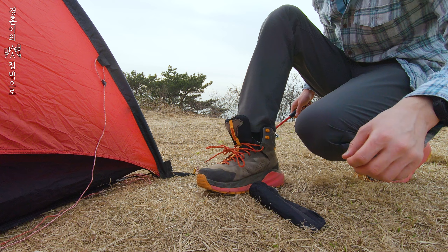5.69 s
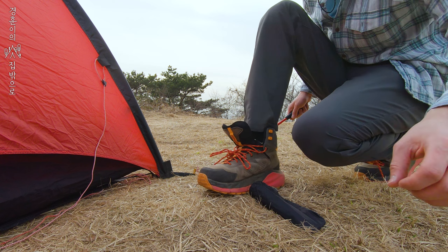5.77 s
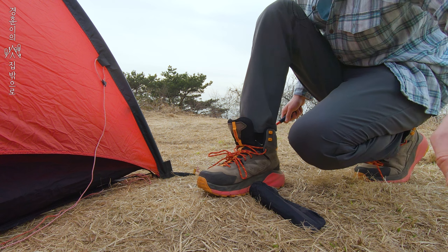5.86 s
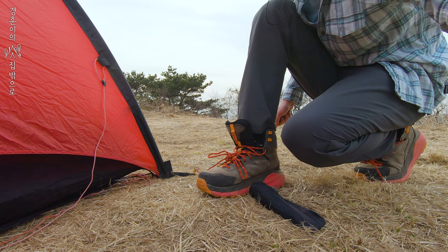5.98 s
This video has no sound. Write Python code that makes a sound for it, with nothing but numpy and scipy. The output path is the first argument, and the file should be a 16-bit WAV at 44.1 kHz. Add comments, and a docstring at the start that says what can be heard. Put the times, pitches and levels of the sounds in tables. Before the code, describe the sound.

A close, dry outdoor sound with faint lumpy wind and a very soft, low engine hum slowly coming nearer. From 0.25 s a hammer strikes a steel peg in hard ground: nine bright, overloaded clacks, about 0.3 s apart at first, then roughly every 0.2 s until 2.1 s. Each is a gritty metallic burst that stops almost dead, with a small earth thud, a faint scattered tail and often a lighter rebound. Clothes swish around 2.2-2.45 s. A slower run of seven blows lasts from 2.54 to 4.8 s, with stronger thuds and soil knocks, the clacks growing shorter and drier. Tiny distant peeps at 0.34 and 2.6 s are barely noticeable. After 4.8 s it is quiet; a small tap at 5.24 s, rustling from 5.35 s, a clear dull knock at 5.5 s, then from 5.7 s a boot crunches dry grass, fading with fabric rustle to 6 s.

```python
"""Hammering a steel tent peg

A hammer drives a steel peg into hard, dry ground in a light breeze: soil-damped modes make bright clacks
that clip, soft pushes make earth thuds and knocks, and the clack shortens within each of two runs of blows.
Snapping threads make clothes rustle, filtered noise makes wind, and sine orders make a far engine.
Gear and straw tap, far peeps sound twice, and at the end a boot shifts on dry grass."""
import sys
import numpy as np
from scipy import signal
from scipy.fft import rfft, irfft, next_fast_len
from scipy.io import wavfile

SR = 44100
rng = np.random.default_rng(int(sys.argv[2]) if len(sys.argv) > 2 else 0)


def bounce(signal):
    """Save signal as a 16-bit WAV file at the path given by the first command-line argument."""
    frames = np.transpose(np.atleast_2d(signal))
    limited = np.clip(frames, -1, 1)
    pcm = np.round(limited * 32767).astype(np.int16)
    wavfile.write(sys.argv[1], SR, pcm)


N = 265658
TIME = np.arange(N) / SR
AGE = TIME[:SR // 6]  # seconds since the start of a short sound

# Hammer blows on the peg. Each row: start in seconds, sliding time of the peg in seconds, relative levels
# of scatter and thud in dB, push on the soil in seconds, relative levels of soil knock and hollow body in dB,
# then frequency in Hz and relative level in dB of the low, the middle and the high ring.
BLOWS = [(0.2553, 0.0035, -2.5, -10.5, 0.0023, -29.5, 2, 4440, -14, 7978, 1, 12890, -2.5),
         (0.5497, 0.0027, 1, -11, 0.0027, -23.5, -9, 4645, -6, 8768, 0.5, 10670, -1.5),
         (0.8172, 0.0022, -6, -16, 0.0032, -28, -10.5, 4250, -14, 5250, -3.5, 12670, -1),
         (1.0194, 0.0026, -4.5, -16.0, 0.0049, -46.5, -13, 4384, -7.5, 5545, -0.5, 13020, -2),
         (1.242, 0.0021, -5, -18, 0.0046, -33.5, -18, 4365, -6, 6152, 2.5, 13150, -14),
         (1.4526, 0.0018, -5, -18.5, 0.0042, -40.5, -15, 3170, -14, 5840, -4.5, 12250, -3),
         (1.6714, 0.0016, -5.5, -17, 0.0043, -28, -9, 3395, -15, 11190, 0.5, 13800, -2),
         (1.8826, 0.0014, -2, -19.5, 0.0028, -41.5, -51, 3420, -20, 8424, -6.5, 11800, 2.5),
         (2.0938, 0.0015, -1.5, -11.5, 0.0029, -31, -3, 3380, -6.5, 9530, -4.5, 12000, -0.5),
         (2.5432, 0.0033, -3.5, 0.5, 0.0024, -30, -2.5, 3880, -9.5, 8840, 2.5, 14000, 3),
         (3.0036, 0.0031, -9, 4.5, 0.004, -13.5, 0, 3660, -14, 5373, -2, 13820, 5),
         (3.484, 0.0019, 4, -5.5, 0.0056, -29.5, -17, 3648, -6.5, 6975, -4, 13940, 0),
         (3.8351, 0.0014, 0, -2.5, 0.003, -16.5, -7.5, 3223, -15.5, 8170, -23, 14470, -7),
         (4.1767, 0.0011, 4.5, -2.0, 0.0023, -14, 4, 3770, -9, 7116, 0.5, 14340, -5.5),
         (4.4905, 0.0011, 4.5, -1.5, 0.0027, -16.5, -8.5, 3850, -10.5, 7014, -6, 11970, -11.5),
         (4.7974, 0.00074, 5, -1, 0.0029, -10, -2, 4110, -9, 7880, -2.5, 13220, -0.5)]
# Spectrum of scattered sound. Each row: frequency in Hz, relative level per Hz in dB.
SCATTER_SPECTRUM = [(200, 4), (600, 8), (1200, -10.5), (2200, -12), (4000, -4), (8000, -2), (13000, 1),
                    (16000, -10.5)]


def from_db(db):
    """Level law: 20 dB is a factor of ten in amplitude."""
    return 10 ** (np.asarray(db) / 20)


def rms_one(x):
    """Normalization to unit effective value."""
    return x / np.sqrt(np.mean(x ** 2) + 1e-20)


def in_time(rows):
    """Linear interpolation: the columns of a table joined by straight lines in time."""
    s, *columns = np.transpose(rows)
    return [np.interp(TIME, s, column) for column in columns]


def add(track, s, sound):
    """Superposition: mixes a sound in from a given second."""
    start = round(s * SR)
    track[start:start + len(sound)] += sound[:N - start]


def band(x, low_hz, high_hz):
    """Band-pass filtering between two corner frequencies."""
    corners = [low_hz, min(high_hz, .45 * SR)]
    return signal.sosfilt(signal.butter(2, corners, "band", fs=SR, output="sos"), x)


def resonate(x, hz, width_hz):
    """Damped resonance: a pole pair whose radius sets the bandwidth, with a gain near 1 at the peak."""
    r = np.exp(-np.pi * width_hz / SR)
    zeros = np.array([1, 0, -1]) * (1 - r * r) / 2
    poles = [1, -2 * r * np.cos(2 * np.pi * hz / SR), r * r]
    return signal.lfilter(zeros, poles, x)


def dying(t60, hold=0):
    """Exponential decay: full strength for the hold, then 60 dB lost in each t60 (both in seconds)."""
    return np.exp(-np.log(1000) * np.maximum(AGE - hold, 0) / t60)


def swell(s, length_s):
    """Gaussian envelope: a smooth rise and fall around a moment, its length taken at half height."""
    return .5 ** ((2 * (TIME - s) / length_s) ** 2)


def half_push(push_s, delay_s):
    """Contact force: one smooth sine-squared push after a delay."""
    return np.sin(np.pi * np.clip((AGE - delay_s) / push_s, 0, 1)) ** 2


def spectral_gain(spectrum, size):
    """Frequency response: levels joined by straight lines over the logarithm of frequency."""
    hz, db = np.transpose(spectrum)
    bins = np.maximum(np.arange(size // 2 + 1) * SR / size, 1)
    return from_db(np.interp(np.log(bins), np.log(hz), db))


def colour(x, spectrum):
    """Spectral shaping: weights each frequency of a sound by a spectrum and sets its rms to 1."""
    size = next_fast_len(len(x))
    return rms_one(irfft(rfft(x, size) * spectral_gain(spectrum, size), size)[:len(x)])


def noise(spectrum, size=N):
    """Random sound with a prescribed spectrum, rms 1."""
    return colour(rng.standard_normal(size), spectrum)


def burst(low_hz, high_hz):
    """Band-limited noise: a short stretch, rms 1."""
    return rms_one(band(rng.standard_normal(len(AGE)), low_hz, high_hz))


def drift(rate):
    """Slow fluctuation: random points, rate per second, joined by lines; the last is held; rms 1."""
    knots = rng.standard_normal(1000)
    return rms_one(np.interp(TIME * rate, np.arange(len(knots)), knots))


def grains(per_s, spread_db):
    """Stick-slip friction as a random train of tiny snaps of uneven size, rms 1."""
    sizes = from_db(spread_db * np.minimum(rng.exponential(1, N), 4))
    signed_sizes = sizes * rng.choice([-1, 1], N)
    return rms_one(signed_sizes * (rng.random(N) < per_s / SR))


def outdoors(gust_db=2.0, gust_hz=110, air_db=-43.5, rumble_db=1):
    """Turbulence: wind lumpy in the bass and steady above, over the hush of open country and a far engine."""
    # Strength of the breeze. Each row: time in seconds, relative level in dB.
    breeze_levels = [(0.0, -35), (0.92, -38), (1.09, -41), (1.52, -39), (2.33, -41.5), (2.8, -34),
                     (3.22, -37), (3.42, -35), (6.02, -35.5)]
    # Spectrum of the wind. Each row: frequency in Hz, relative level per Hz in dB.
    wind_spectrum = [(10, 2), (30, 0.5), (60, -1.5), (100, -10), (210, -20), (320, -23), (550, -30),
                     (850, -33.5), (1300, -49.5), (2600, -75)]
    # Spectrum of the open country. Each row: frequency in Hz, relative level per Hz in dB.
    air_spectrum = [(10, 6), (35, -0.5), (90, -11.5), (170, -9.5), (300, -24), (550, -27), (850, -33.5),
                    (1300, -46.5), (2200, -43.5), (6000, -55.5), (9000, -41.5), (13000, -49),
                    (16000, -60.5)]
    gust = from_db(-33.5) * swell(s=0.095, length_s=0.074)  # one short gust on top of the breeze
    strength = from_db(in_time(breeze_levels)[0] + rumble_db) + gust
    wind = noise(wind_spectrum)
    rumble = signal.sosfiltfilt(signal.butter(2, gust_hz, fs=SR, output="sos"), wind)
    lumpy_wind = wind - rumble + rumble * from_db(gust_db * drift(13))
    return strength * lumpy_wind + from_db(air_db) * noise(air_spectrum) + drone()


def drone(mean_hz=119.5, waver=.016, throb_db=2.0, start_db=-48.5, rise_db_per_s=1.08):
    """Harmonic series: a far engine slowly comes nearer, its pitch and orders made unsteady by moving air."""
    # Orders of the engine. Each row: multiple of the base frequency, relative level in dB.
    engine_orders = [(1, 2.5), (2, -9), (3, -13.5), (4, -21)]
    turns = np.cumsum(mean_hz * (1 + waver * drift(16))) / SR
    orders = np.zeros(N)
    for k, db in engine_orders:
        orders += from_db(db + throb_db * drift(18)) * np.sin(2 * np.pi * round(k) * turns)
    return from_db(start_db + rise_db_per_s * TIME) * rms_one(orders)


def clothes(catch_db=1.0, rub_db=-0.5, slide_db=-5):
    """Stick-slip friction: threads catch as arm and knee move, steadily, in each downswing and in rustles."""
    # Steady rubbing, stronger as the person gets up. Each row: time in seconds, relative level in dB.
    rubbing_levels = [(0.0, -64), (1.98, -73), (2.31, -60), (3.25, -59), (3.67, -63), (4.07, -60.5),
                      (4.78, -61.5), (5.55, -47), (6.02, -49.5)]
    # Rustles of sleeve and trousers. Each row: time of the peak in seconds, length in seconds,
    # relative level of rubbing folds in dB, relative level of smooth sliding in dB.
    rustle_events = [(.48, 0.056, -62.5, -62.5), (1.4, 0.074, -66, -66), (2.2, 0.054, -55, -54.5),
                     (2.31, 0.058, -64, -52.5), (2.37, 0.026, -56, -42), (2.428, 0.031, -69, -38),
                     (2.66, 0.23, -71, -59), (2.96, .06, -57.5, -58.5), (3.33, 0.11, -64.5, -70),
                     (4.02, 0.057, -62, -78.5), (5.35, .17, -51.5, -56.5), (5.59, 0.032, -59, -54),
                     (5.755, 0.068, -48.5, -46.5)]
    # Spectrum of catching threads. Each row: frequency in Hz, relative level per Hz in dB.
    thread_spectrum = [(500, -8.5), (1000, 0.5), (1700, 2.5), (2300, 0.5), (3200, 0.5), (4800, -0.5),
                       (7000, -3), (10000, -6), (13000, -4), (16000, -7.5)]
    # Spectrum of smooth sliding. Each row: frequency in Hz, relative level per Hz in dB.
    swish_spectrum = [(1000, -8), (3000, -2.5), (6000, -4), (9000, 6), (12000, -1), (16000, -7)]
    swing_lead_s, swing_length_s, swing_db = .07, 0.28, -8  # lead before the blow; level over the rubbing

    steady = from_db(in_time(rubbing_levels)[0])
    swings = sum(swell(s - swing_lead_s, swing_length_s) for s, *_ in BLOWS)
    rub = from_db(rub_db) * steady * (1 + from_db(swing_db) * swings)
    slide = from_db(slide_db) * steady
    for s, length_s, folds_db, smooth_db in rustle_events:
        shape = swell(s, length_s)
        rub = rub + from_db(folds_db) * shape
        slide = slide + from_db(smooth_db) * shape
    snaps = colour(grains(per_s=15000, spread_db=4.5), thread_spectrum)
    threads = from_db(catch_db * drift(60)) * snaps
    return rub * threads + slide * noise(swish_spectrum)


def taps(knock_t60=0.035, tick_t60=0.0065):
    """Damped impact: small taps of gear and straw, a dull knock with a dry tick on top."""
    # Each row: start in seconds, knock level in dB, knock frequency in Hz, tick level in dB.
    tap_events = [(0.026, -52.5, 2500, -65.5), (1.110, -63, 3493, -59), (1.545, -55, 2000, -53),
                  (4.297, -49.5, 4000, -47), (5.24, -40, 1890, -58), (5.494, -24.5, 530, -26),
                  (5.806, -34, 895, -50)]
    out = np.zeros(N)
    for s, knock_db, hz, tick_db in tap_events:
        add(out, s, from_db(knock_db) * burst(hz / 2, hz * 2) * dying(knock_t60))
        add(out, s, from_db(tick_db) * burst(6200, 12000) * dying(tick_t60))
    return out


def blows(soil_knock_db=2):
    """Impact excitation: steel on steel, its scatter, and the thud and dull knock of packed soil."""
    # the free shaft clangs most at one depth, reached at this time, and less on either side of it
    free_s, free_db, fall_db_per_s = 1.2, 0, 15.5
    # its dull remainder fades as the soil grips the peg
    gripped_db, grip_db_per_s = -9.5, 2.5
    out = np.zeros(N)
    for s, slide_s, scatter_db, thud_db, push_s, knock_db, body_db, *pairs in BLOWS:
        rings = list(zip(pairs[::2], pairs[1::2]))
        free_shaft_db = free_db - fall_db_per_s * abs(s - free_s)
        shaft_db = max(free_shaft_db, gripped_db - grip_db_per_s * s)
        add(out, s, clack(slide_s, body_db, shaft_db, rings))
        add(out, s, from_db(scatter_db) * scatter(rings))
        add(out, s, from_db(thud_db) * thud(push_s, delay_s=0.0017))
        add(out, s, low_swing())
        add(out, s, from_db(soil_knock_db + knock_db) * soil_knock())
    return out


def clack(slide_s, body_db, shaft_db, rings, level_db=-0.2, hollow_db=-17.5, ring_db=-1.5, width_hz=80, t60=0.01):
    """Friction, then damping: the peg screeches while it slides and stops dead; its rings vary by blow."""
    tones = np.zeros(len(AGE))
    for hz, db in rings:
        # rubbing soil jostles the phase, which widens each ring
        jostle = np.cumsum(rng.standard_normal(len(AGE))) * np.sqrt(2 * np.pi * width_hz / SR)
        tones += from_db(db + ring_db) * np.sin(2 * np.pi * (hz * AGE + rng.random()) + jostle)
    body = from_db(hollow_db + body_db) * burst(low_hz=930, high_hz=2530)
    clang = from_db(shaft_db) * burst(low_hz=5150, high_hz=6490)
    return from_db(level_db) * (steel() + tones + body + clang) * dying(t60, hold=slide_s)


def steel(uneven_db=1.5, grit_db=-9):
    """Modal excitation: chattering contact drives soil-damped modes in a new balance, over crunching grit."""
    # Modes of peg and hammer head. Each row: frequency in Hz, width in Hz, mean relative level in dB.
    steel_modes = [(3340, 260, 0), (3670, 230, -8), (4140, 110, -5.5), (5160, 230, -10), (4950, 230, -3),
                   (6000, 120, 1), (5800, 590, -5), (7450, 120, -3.5), (8140, 1400, 2.5), (9040, 460, 4),
                   (9340, 350, 1), (10940, 350, -1), (11245, 240, 4), (12100, 1500, -2.5), (12810, 850, 2),
                   (13880, 150, -14), (14370, 660, 5.5), (14200, 1200, -8.5)]
    # Spectrum of the grit. Each row: frequency in Hz, relative level per Hz in dB.
    grit_spectrum = [(200, -10.5), (500, -4), (1000, -5.5), (2000, -7.5), (4000, -17), (8000, 4),
                     (14000, -1), (16000, 1.5)]
    modes = np.zeros(len(AGE))
    for hz, width_hz, db in steel_modes:
        chatter = rng.standard_normal(len(AGE))
        gain = from_db(db + uneven_db * rng.standard_normal())
        modes += gain * resonate(chatter, hz, width_hz)
    return rms_one(rms_one(modes) + from_db(grit_db) * noise(grit_spectrum, size=len(AGE)))


def scatter(rings, spray_db=-24, spray_t60=0.074, lumpy_db=4.0, linger_db=-29, linger_t60=0.06, width_hz=650):
    """Diffuse scattering: ground, tent and body return the clack in lumps, and the peg's rings linger."""
    linger = np.zeros(len(AGE))
    for hz, db in rings:
        narrow = resonate(rng.standard_normal(len(AGE)), hz, width_hz)
        linger += from_db(db) * rms_one(resonate(narrow, hz, 2 * width_hz))
    lumps = from_db(lumpy_db * drift(310)[:len(AGE)])
    spray = from_db(spray_db) * noise(SCATTER_SPECTRUM, size=len(AGE)) * lumps * dying(spray_t60)
    return spray + from_db(linger_db) * linger * dying(linger_t60)


def thud(push_s, delay_s, low_hz=88, high_hz=255, turf_hz=145, turf_width_hz=45, turf_db=-5):
    """Forced vibration: a soft push makes the earth heave once or twice, and the turf swings on a little."""
    push = half_push(push_s, delay_s)
    heave = band(push, low_hz, high_hz) + from_db(turf_db) * resonate(push, turf_hz, turf_width_hz)
    return heave / np.abs(heave).max()


def low_swing(db=-17.5, push_s=0.0093, delay_s=0.0041, low_hz=25, high_hz=110):
    """Slow swing: every blow is followed by one slow, deep swing of opposite sign."""
    swing = band(half_push(push_s, delay_s), low_hz, high_hz)
    return -from_db(db) * swing / np.abs(swing).max()


def soil_knock(low_hz=375, high_hz=660, contact_s=0.001, delay_s=.0035):
    """Heavy damping: the peg knocks on packed soil, which rings for only two or three cycles."""
    knock = band(half_push(contact_s, delay_s), low_hz, high_hz)
    return knock / np.abs(knock).max()


def echo(x, delay_s, db):
    """Reflection: one faint delayed copy, without bass or extreme treble."""
    delayed = np.pad(x, (round(delay_s * SR), 0))[:N]
    return from_db(db) * band(delayed, 900, 12500)


def far_peeps():
    """Narrow-band noise: short, slightly hoarse peeps from far away."""
    # Each row: start in seconds, length in seconds, centre frequency in Hz, level before the arch in dB.
    peep_events = [(0.336, 0.043, 980, -55.5), (2.608, 0.087, 2300, -62)]
    out = np.zeros(N)
    for s, length_s, hz, db in peep_events:
        arch = np.sin(np.pi * np.clip(AGE / length_s, 0, 1)) ** .5
        add(out, s, from_db(db) * arch * burst(.92 * hz, 1.08 * hz))
    return out


def rebounds(clack_db=1, t60=0.01, hold_s=0.00053):
    """Repeated impact: the hammer drops back on the peg with a lighter, duller touch."""
    # Each row: start in seconds, relative level of the clack in dB, peak level of the thud in dB.
    rebound_events = [(0.5683, -21, -22), (1.0325, -31.5, -27.5), (1.2529, -30, -22.5),
                      (1.4624, -31, -32.5), (1.6843, -31, -20), (1.8974, -25.5, -22.5),
                      (2.1085, -26.5, -19.5), (2.5587, -21, -16.5), (3.0181, -30, -21.5),
                      (3.4997, -39.5, -18.5), (4.1968, -22.5, -14.5), (4.507, -19.5, -12.5),
                      (4.823, -23, -15.5)]
    out = np.zeros(N)
    for s, db, thud_db in rebound_events:
        touch = rms_one(band(noise(SCATTER_SPECTRUM, size=len(AGE)), 400, 7700))
        add(out, s, from_db(clack_db + db) * touch * dying(t60, hold=hold_s))
        add(out, s, from_db(thud_db) * thud(push_s=0.0013, delay_s=0.001))
    return out


def boot(start_s=5.701, db=-31.5, attack_s=0.014, hold_s=0.04, t60_s=0.52):
    """Granular friction: dry grass crunches under a twisting sole, a quick bite, a hold, then a decay."""
    # Spectrum of the crunch. Each row: frequency in Hz, relative level per Hz in dB.
    scuff_spectrum = [(150, -4), (360, 5.5), (750, -5.5), (1400, -4), (2300, -8.5), (4000, -19),
                      (9000, -22), (16000, -27)]
    age = TIME - start_s
    bite = np.clip(age / attack_s, 0, 1)  # the decay starts at the end of the hold, counted from the start
    press = bite * np.exp(-np.log(1000) * np.maximum(age - hold_s, 0) / t60_s)
    return from_db(db) * press * colour(grains(per_s=1500, spread_db=2.5), scuff_spectrum)


def ports(mid):
    """Phase difference: a side signal in quadrature gives two close microphone ports equal levels."""
    # Difference between the ports. Each row: frequency in Hz, side level relative to mid in dB.
    port_difference = [(60, -44.5), (170, -46), (350, -34.5), (700, -30.5), (1400, -24.5), (2800, -26.5),
                       (5600, -33), (14000, -33)]
    size = next_fast_len(N)
    side = irfft(1j * rfft(mid, size) * spectral_gain(port_difference, size), size)[:N]
    return np.array([mid + side, mid - side])


def scene():
    """Superposition of all sources, close to the centre; only the hammer blows have an echo."""
    background = outdoors() + clothes() + taps()
    hammer = blows()
    hammer = hammer + echo(hammer, delay_s=.0442, db=-54)
    return ports(background + hammer + far_peeps() + rebounds() + boot())


def record(dry):
    """Overload: peaks beyond full scale are clipped, then a steep low-pass removes the extreme treble."""
    clipped = np.clip(dry, -1, 1)
    # 60 dB down from 16300 Hz upward
    return signal.sosfilt(signal.cheby2(20, 60, 16300, fs=SR, output="sos"), clipped)


dry = scene()
out = record(dry)
bounce(out)
```